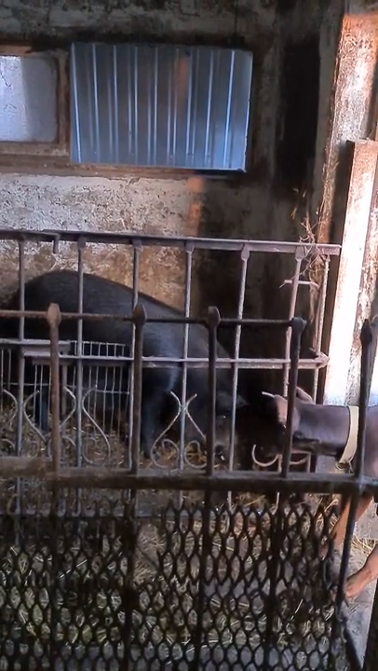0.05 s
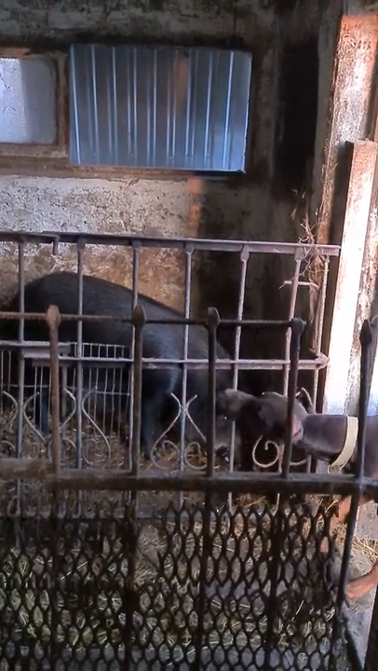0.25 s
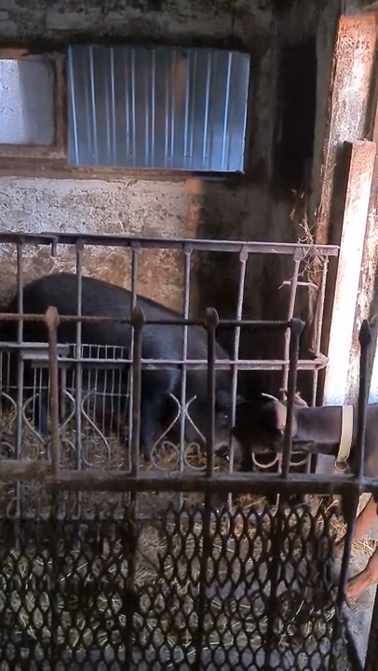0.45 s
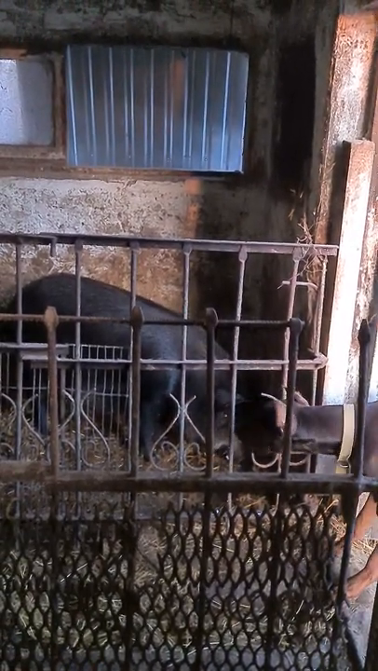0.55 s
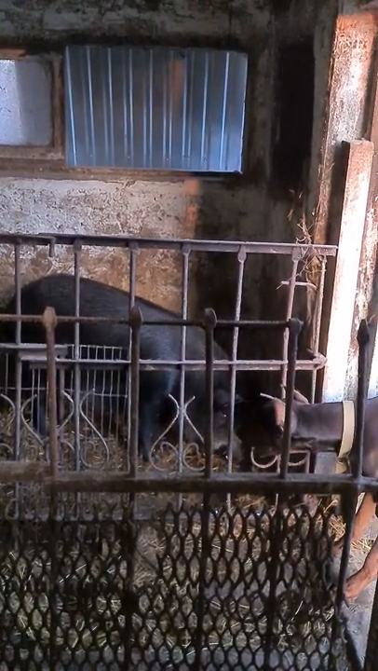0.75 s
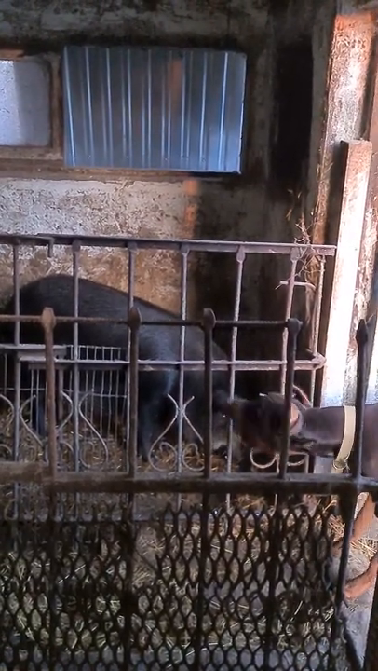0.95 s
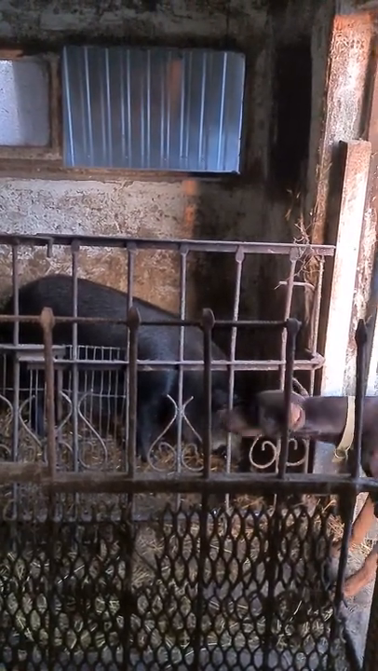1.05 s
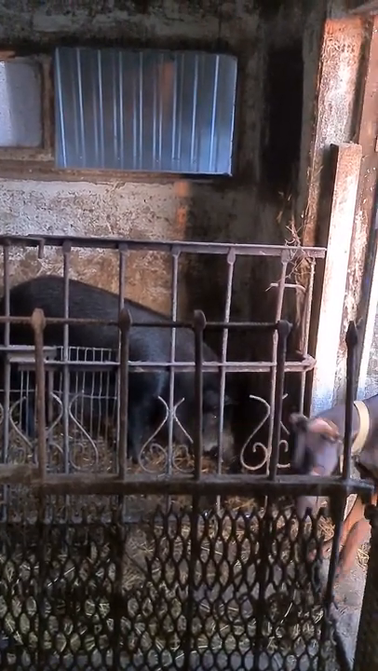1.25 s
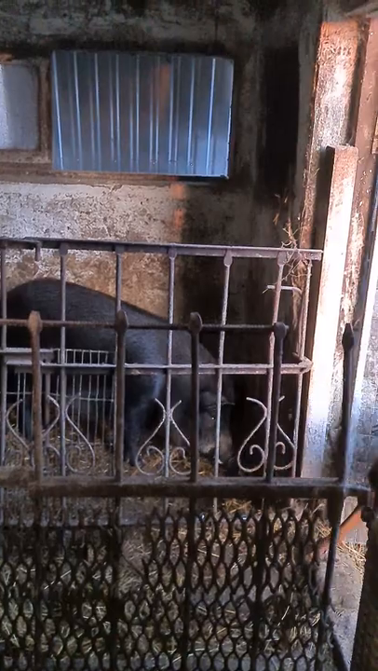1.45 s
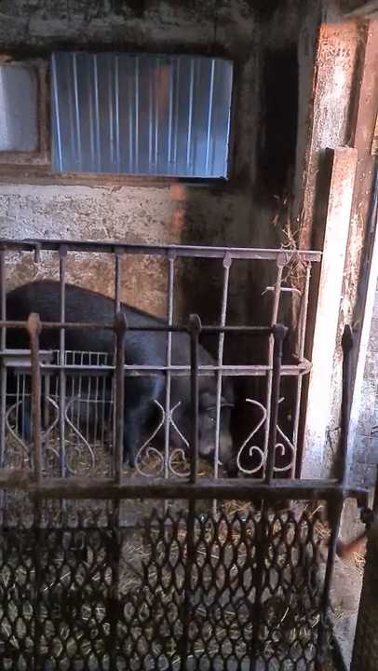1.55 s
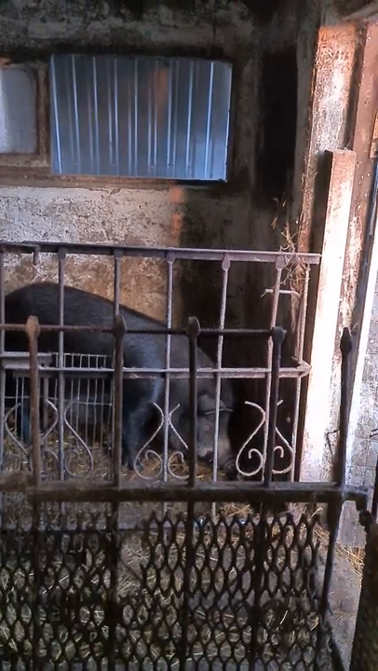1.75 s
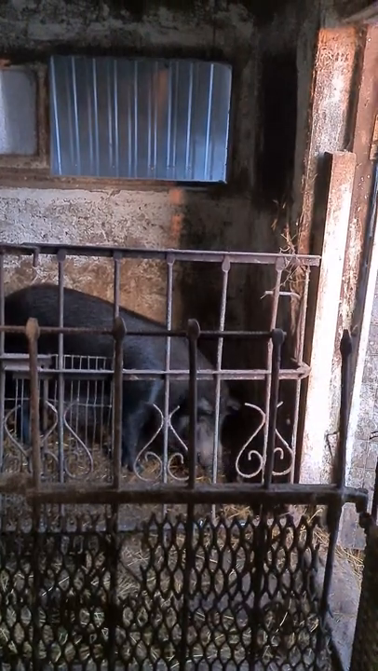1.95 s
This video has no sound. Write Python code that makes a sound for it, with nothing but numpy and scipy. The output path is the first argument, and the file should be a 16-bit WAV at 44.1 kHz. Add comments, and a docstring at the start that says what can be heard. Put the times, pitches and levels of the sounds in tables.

```python
"""Two barks beside a pen

A dog barks twice close by, a little to the right, beside a masonry animal pen; soft footfalls follow.
Each bark is a sine hoot joined by overtones that break up into rasp, sagging in pitch; echoes and
decaying noise form the ring of the walls. Hum is wavering sines, hiss and footfalls are shaped noise.
Gain control ducks everything at each bark and recovers slowly."""
import sys
import numpy as np
from scipy import signal
from scipy.fft import rfft, irfft
from scipy.io import wavfile
from scipy.ndimage import uniform_filter1d

SR = 44100
rng = np.random.default_rng(int(sys.argv[2]) if len(sys.argv) > 2 else 0)


def persist_wave(psi):
    """Save psi, clipped to +-1, as 16-bit WAV."""
    counts = np.round(np.clip(psi, -1, 1) * 32767).astype(np.int16)
    wavfile.write(sys.argv[1], SR, np.atleast_2d(counts).T)


N = 85995
T = np.arange(N) / SR
HZ = np.fft.rfftfreq(N, 1 / SR)

# Hum lines: (frequency [Hz], level [dB], unsteadiness [-])
HUM_LINES = [(59, -56, .8), (82.8, -47.5, 0.63), (167.5, -56.5, 0.49), (219, -64, .7), (315.3, -55, .3)]
# Hiss spectrum: (frequency [Hz], relative level [dB])
AIR_SPECTRUM = [(20, -27.5), (40, -9.5), (75, -11.5), (113, -8), (200, -9.5), (275, -23.5), (380, -14.5),
                (520, -12), (1040, -15.5), (1430, -19), (2400, -20), (3580, -17.5), (4950, -22),
                (6850, -16.5), (8970, -30), (13800, -16.5), (15800, -26.5)]
# Hiss balance: (frequency [Hz], left minus right [dB])
AIR_BALANCE = [(60, -0.5), (110, 7), (200, -0.5), (380, 1.5), (700, -4.5), (1290, -1), (2380, -1.5),
               (4400, -5.5), (8120, -4), (15000, -12.5)]
# Hiss left-right likeness: (frequency [Hz], correlation [-])
AIR_LIKENESS = [(60, 1), (180, 0.78), (550, 0.71), (1650, 0.52), (4970, 0.14), (15000, 0.052)]
AIR_LEVEL_DB = -40.5

# Footfalls on littered ground: (time [s], thud level [dB], scuff level [dB])
STEPS = [(1.562, -39.5, -47), (1.666, -44, -43.5), (1.773, -44.5, -47), (1.85, -42.5, -45)]
# Thud spectrum: (frequency [Hz], relative level [dB])
THUD_SPECTRUM = [(30, -6), (65, 1.5), (220, -9), (500, -28), (2000, -47)]
# Scuff spectrum: (frequency [Hz], relative level [dB])
SCUFF_SPECTRUM = [(200, -6), (900, -1), (2300, 7), (3500, 13), (7000, -14), (9000, -17), (13000, -13)]
STEP_RISE_S = 0.018

# Low huffs as the jaws open and shut: (time [s], level [dB])
HUFFS = [(.198, -28), (0.344, -22), (0.919, -47.5), (1.076, -26.5)]
# Huff spectrum: (frequency [Hz], relative level [dB])
HUFF_SPECTRUM = [(70, -37), (170, -4.5), (250, -10), (335, 5.5), (600, -7), (1500, -45)]
HUFF_RISE_S = 0.017

# Wall echoes: (left delay [s], right delay [s], level [dB])
ECHOES = [(.0232, .0187, -15.5), (0.0326, .0298, -4)]
# Pen decay: (frequency [Hz], time to fall 60 dB [s])
PEN_T60 = [(200, .33), (480, 0.38), (900, 0.33), (1300, 0.29), (1700, 0.28), (2600, 0.36), (6000, 0.21),
           (12000, 0.072)]
# Standing waves between the walls: (frequency [Hz], width [Hz], lift [dB])
PEN_MODES = [(505, 36, -1.5), (857, 94, 5), (1308, 26, 8.5)]
PEN_BUILD_S, PEN_LIKENESS, PEN_LIKENESS_HZ = 0.025, 0.45, 1800

# Barks, one list each:
# (time [s], pitch [Hz], fundamental [dB], overtones and rasp [dB], rush of air [dB])
BARKS = [
    [(.197, 540.7, -22, -50, -64.5), (.203, 540.4, -3.5, -21, -48.5), (.213, 574.4, 4, -14, -39.5),
     (.228, 564.3, -2.5, -0.5, -21.5), (.24, 557.2, -1.5, -3.5, -14.5), (.248, 490.7, -0.5, -1.5, -18),
     (.279, 481.8, -2.5, -2, -14.5), (.302, 469, 2, -26.5, -16.5), (.321, 421, -38, -17, -29)],
    [(.914, 418.4, -37, -74, -91), (.926, 457.3, -12, -32, -73.5), (.937, 532.9, 4, -18, -33),
     (.951, 570.5, 1, -9, -30), (.966, 554.3, -3, -0.5, -18.5), (.982, 560.7, -5, -2, -19.5),
     (1.0, 500.6, 2.5, -5.5, -13), (1.044, 479.2, -1, -12.5, -15.5), (1.069, 441, -15, -29, -35)],
]
# Throat colour of overtones and rasp: (frequency [Hz], relative level [dB])
THROAT_SPECTRUM = [(150, -51.5), (300, -18.5), (450, 1), (680, -2.5), (810, 5.5), (990, 0), (1130, -0.5),
                   (1260, 1.5), (1430, 0), (1700, 0), (1880, -5), (2080, -7.5), (2260, -8.5), (2480, -26),
                   (3400, -31), (4600, -32), (5050, -19.5), (5600, -44.5), (9000, -51.5)]
# Air rushing past the teeth: (frequency [Hz], relative level [dB])
RUSH_SPECTRUM = [(2000, -21), (2800, 2.5), (3500, -13), (4300, -4.5), (5100, 6.5), (6700, 6.5),
                 (8200, -14.5), (9400, 0.5), (10500, -6.5), (12000, 4.5), (15500, -5)]
JITTER_REL, SHIMMER_REL, JITTER_HZ = 0.018, 0.23, 133
OVERTONE_DB, HALF_TONE_DB, RASP_DB, TILT_DB_PER_HARMONIC = -0.5, -6, -3, -0.02
PUFF_DECAY_CYCLES = 1
BREAKUP_S, BREAKUP_SHARE = 0.075, 0.46  # share of overtone power lost to rasp
CHEST_HZ = 295  # low cut of the voice
VOICE_LEFT_DB, RUSH_LEFT_DB, LEFT_LAG_S = -2.25, -19.5, 0.00009
VOICE_WET_DB, RUSH_WET_DB, RUSH_WET_LEFT_DB = -3.5, -11, -7

LIMIT_DB, START_DUCK_DB = -9, 6.5
ATTACK_S, RECOVER_DB_PER_S = 0.02, 14
KNEE = 0.75  # peaks above this are rounded off
EDGE_HZ = 15850


def amp(db):
    """Decibels to gain."""
    return 10 ** (np.asarray(db) / 20)


def unit(x):
    """Scales to rms 1."""
    return x / np.sqrt(np.mean(x ** 2) + 1e-20)


def read(points, hz):
    """Interpolates a table on a log-frequency axis."""
    f, value = np.transpose(points)
    return np.interp(np.log(hz + 1), np.log(f + 1), value)


def colour(x, points):
    """Gives x a spectral shape, at rms 1."""
    return unit(irfft(rfft(x) * amp(read(points, HZ)), N))


def wander(rate_hz):
    """Smooth random motion, mostly below rate_hz, at rms 1."""
    return unit(irfft(rfft(rng.standard_normal(N)) / (1 + (HZ / rate_hz) ** 4), N))


def delay(x, s):
    """Delays x by s seconds."""
    return np.interp(T - s, T, x, left=0)


def level(s, db):
    """Gain curve through dB points, near silent outside them."""
    times_s = np.r_[s[0] - .004, s, s[-1] + .02]
    return amp(np.interp(T, times_s, np.r_[-120, db, -120]))


def swell(s, rise_s):
    """Rises to 1 in rise_s, then dies away."""
    u = np.maximum(T - s, 0) / rise_s
    return u * np.exp(1 - u)


def hum():
    """Low lines wavering in level and phase, as of a distant motor."""
    total = np.zeros(N)
    for hz, db, shake in HUM_LINES:
        strength = amp(db) * np.sqrt(2) * (1 + .5 * shake * wander(9))
        total += strength * np.sin(2 * np.pi * hz * T + shake * wander(5.4))
    return total


def air():
    """Outdoor hiss: noise more alike left and right in the bass, its level flickering slightly."""
    a, b = rfft(rng.standard_normal((2, N)))
    same = np.clip(read(AIR_LIKENESS, HZ), -1, 1)
    lean = amp(read(AIR_BALANCE, HZ))
    pair = np.array([a * lean, same * a + np.sqrt(1 - same ** 2) * b])
    pair /= np.sqrt(1 + lean ** 2 + 2 * same * lean)  # holds the power of left plus right
    hiss = unit(irfft(pair * amp(read(AIR_SPECTRUM, HZ)), N))
    return amp(AIR_LEVEL_DB + .5 * wander(12)) * hiss


def steps():
    """An animal shifts its feet: a dull thud and a grainy scuff each time."""
    thud_gain = sum(amp(db) * swell(s, STEP_RISE_S) for s, db, _ in STEPS)
    scuff_gain = sum(amp(db) * swell(s, STEP_RISE_S) for s, _, db in STEPS)
    thud = thud_gain * colour(rng.standard_normal(N), THUD_SPECTRUM)
    noise = rng.standard_normal((2, N))
    # exponential dB spread makes sparse strong grains
    grain_db = 4.9 * np.minimum(rng.exponential(1, (2, N)), 6)
    grit = noise * amp(grain_db)
    left = amp(-2) * colour(grit[0], SCUFF_SPECTRUM)
    right = colour(grit[1], SCUFF_SPECTRUM)
    return thud + scuff_gain * np.array([left, right])


def huffs():
    """A short dull puff of noise opens and closes each bark."""
    gain = sum(amp(db) * swell(s, HUFF_RISE_S) for s, db in HUFFS)
    return gain * colour(rng.standard_normal(N), HUFF_SPECTRUM)


def pen(x):
    """Diffuse ring of the pen: noise that builds up briefly and decays at a rate set by frequency."""
    hz, t, z = signal.stft(rng.standard_normal((2, SR)), SR, nperseg=256)
    decay = amp(-60 * t / read(PEN_T60, hz)[:, None])
    tail = signal.istft(z * decay, SR, nperseg=256)[1][:, :SR]
    build = 1 - np.exp(-(T[:SR] / PEN_BUILD_S) ** 4)
    tail = rfft(tail * build, N)
    same = PEN_LIKENESS / (1 + (HZ / PEN_LIKENESS_HZ) ** 2)
    tail[1] = same * tail[0] + np.sqrt(1 - same ** 2) * tail[1]
    # level the spectrum before lifting the modes
    tail /= np.sqrt(uniform_filter1d(abs(tail) ** 2, size=300, axis=1))
    for f, width_hz, lift_db in PEN_MODES:
        tail *= 1 + (amp(lift_db) - 1) / (1 + 2j * (HZ - f) / width_hz)
    return signal.fftconvolve(x[None], irfft(tail, N)[:, :SR], axes=1)[:, :N]


def bark(rows):
    """Jittering folds: strong fundamental, overtones breaking into half tones and puffs, rush of air."""
    s, pitch_hz, tone_db, rasp_db, rush_db = np.transpose(rows)
    opening = level(s, rasp_db)
    rough = np.clip((T - s[0]) / BREAKUP_S, 0, 1)
    strain = np.sqrt(opening / opening.max())

    jitter = 1 + JITTER_REL * strain * wander(JITTER_HZ)
    turns = np.cumsum(np.interp(T, s, pitch_hz) * jitter) / SR
    phase = 2 * np.pi * turns
    tone = np.sqrt(2) * np.sin(phase) * (1 + SHIMMER_REL * rough * wander(JITTER_HZ))

    overtones = unit(sum(amp(TILT_DB_PER_HARMONIC * k) * np.cos(k * phase + k ** 2)
                         for k in range(2, 10)))
    half_tones = unit(sum(np.cos((k + .5) * phase) * wander(rate_hz=37.5) for k in range(1, 5)))
    # each opening of the folds lets out a puff of air
    puff_gain = .4 + np.exp(-(turns % 1) / PUFF_DECAY_CYCLES)
    puffs = unit(puff_gain * rng.standard_normal(N))

    folds = colour(overtones, THROAT_SPECTRUM) * amp(OVERTONE_DB)
    folds *= np.sqrt(1 - BREAKUP_SHARE * rough ** 2)
    rasp = colour(half_tones, THROAT_SPECTRUM) * amp(HALF_TONE_DB)
    rasp += colour(puffs, THROAT_SPECTRUM) * amp(RASP_DB)
    voice = tone * level(s, tone_db) + opening * (folds + rasp * rough)
    rush = colour(puffs, RUSH_SPECTRUM) * level(s, rush_db)
    return voice, rush


def dog():
    """Both barks: direct sound, wall echoes and the ring of the pen."""
    voice, rush = sum(np.array(bark(rows)) for rows in BARKS)
    low_cut = signal.butter(4, CHEST_HZ, "high", fs=SR, output="sos")
    voice = signal.sosfilt(low_cut, voice) + huffs()
    rush_direct = np.array([amp(RUSH_LEFT_DB) * delay(rush, LEFT_LAG_S), rush])
    rush_ring = amp(RUSH_WET_DB) * pen(rush) * amp([[RUSH_WET_LEFT_DB], [0]])
    direct = np.array([amp(VOICE_LEFT_DB) * delay(voice, LEFT_LAG_S), voice])
    echoes = sum(amp(db) * np.array([delay(voice, left_s), delay(voice, right_s)])
                 for left_s, right_s, db in ECHOES)
    ring = amp(VOICE_WET_DB) * pen(voice)
    return direct + echoes + ring + rush_direct + rush_ring


def scene():
    """The dog over footfalls, hum and hiss."""
    return dog() + steps() + hum() + air()


def record(dry):
    """Gain control that falls fast and recovers slowly, a soft ceiling, then a low-pass."""
    power = abs(uniform_filter1d((dry ** 2).mean(0), size=240))
    power_db = 10 * np.log10(power + 1e-12)
    # running maximum on a rising ramp: a peak hold that recovers linearly in dB
    recovery_db = RECOVER_DB_PER_S * T
    held_db = np.maximum.accumulate(np.maximum(power_db - LIMIT_DB + recovery_db, START_DUCK_DB))
    target_db = np.maximum(held_db - recovery_db, 0)
    r = np.exp(-1 / (ATTACK_S * SR))
    # smoothing starts from START_DUCK_DB
    duck_db = signal.lfilter([1 - r], [1, -r], target_db - START_DUCK_DB) + START_DUCK_DB
    ducked = dry * amp(-duck_db)

    clean = np.clip(ducked, -KNEE, KNEE)
    rounded = clean + (1 - KNEE) * np.tanh((ducked - clean) / (1 - KNEE))
    low_pass = signal.firwin(511, EDGE_HZ, window=("kaiser", 9), fs=SR)
    return signal.oaconvolve(rounded, low_pass[None], "same")


dry = scene()
out = record(dry)
persist_wave(out)
```